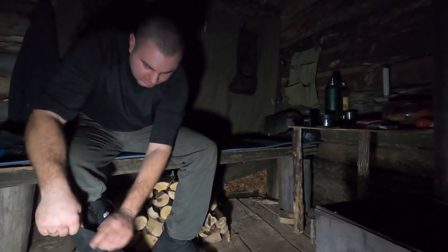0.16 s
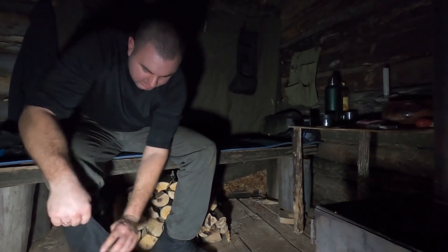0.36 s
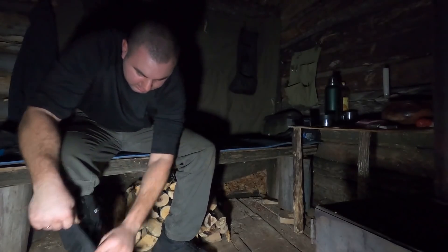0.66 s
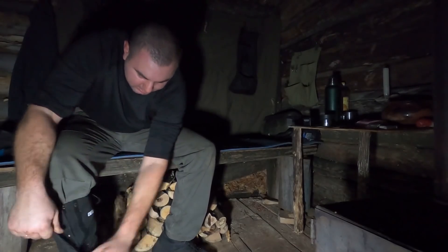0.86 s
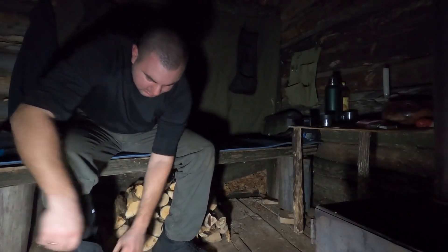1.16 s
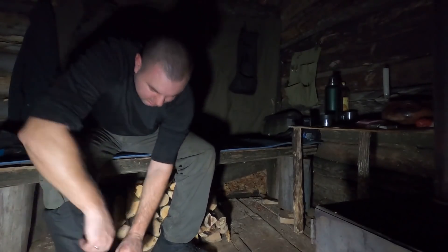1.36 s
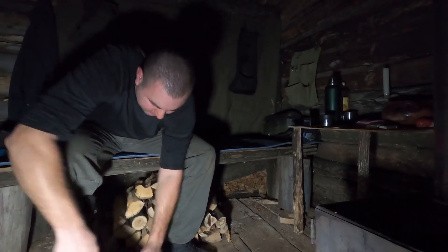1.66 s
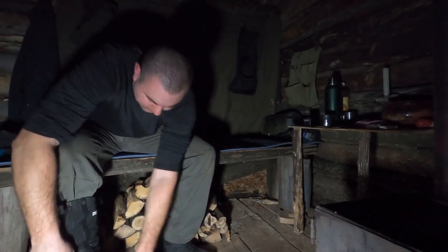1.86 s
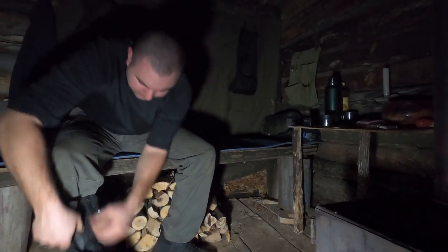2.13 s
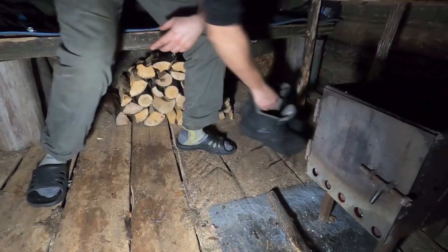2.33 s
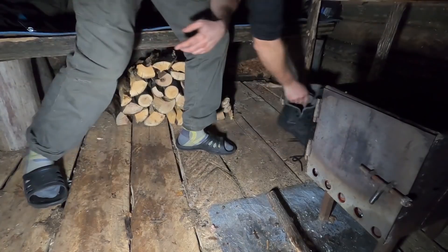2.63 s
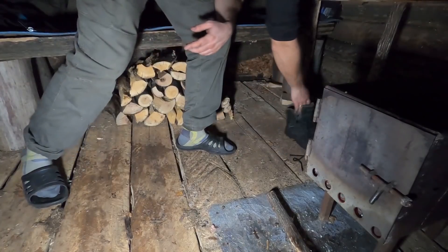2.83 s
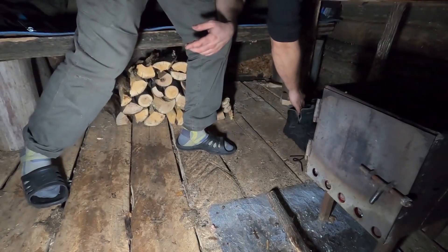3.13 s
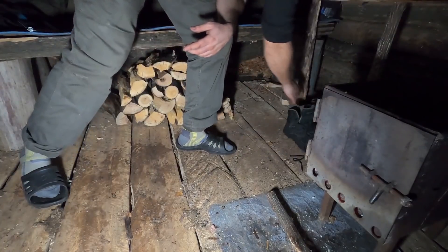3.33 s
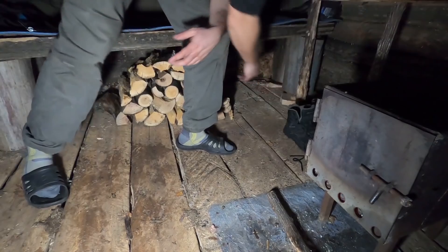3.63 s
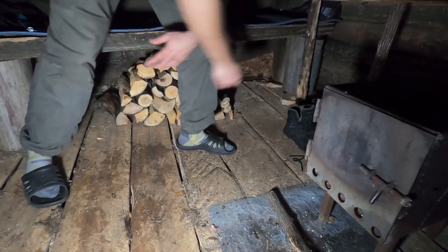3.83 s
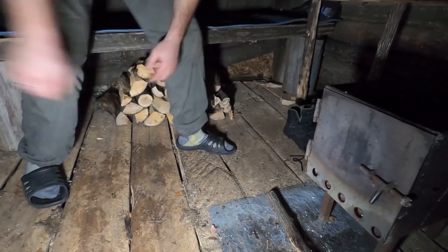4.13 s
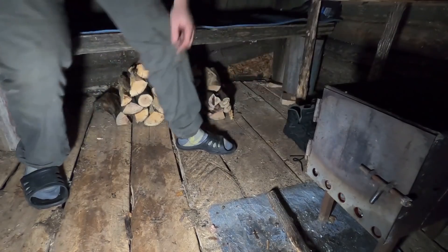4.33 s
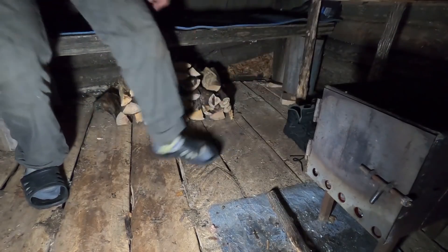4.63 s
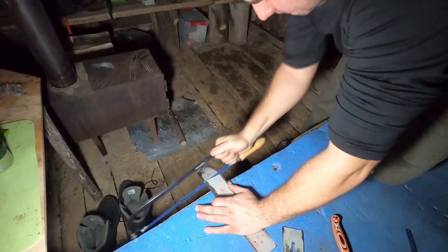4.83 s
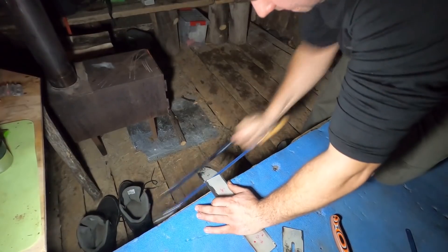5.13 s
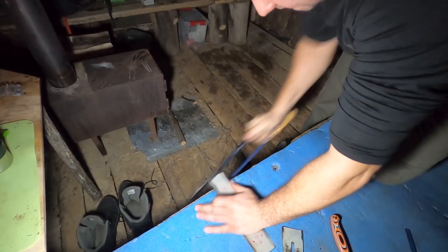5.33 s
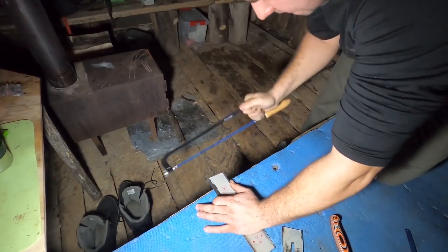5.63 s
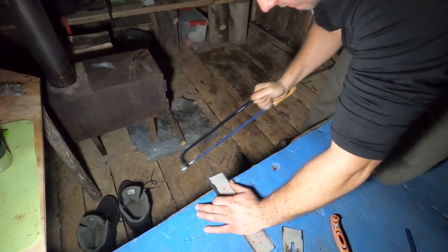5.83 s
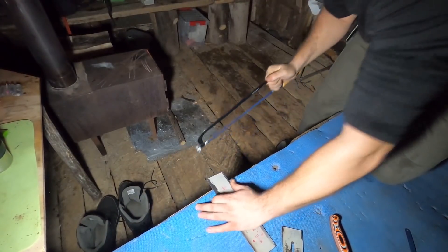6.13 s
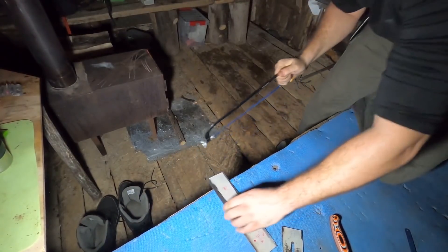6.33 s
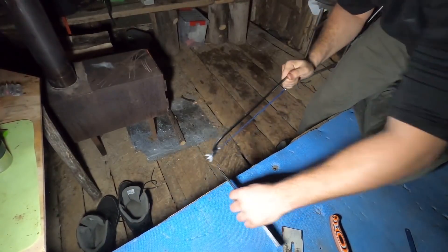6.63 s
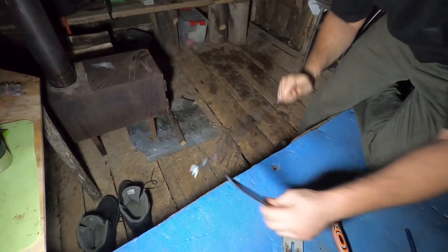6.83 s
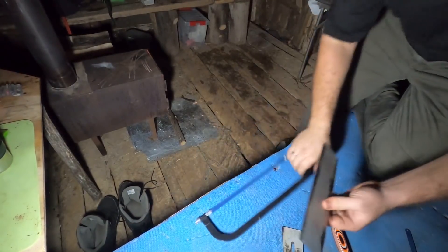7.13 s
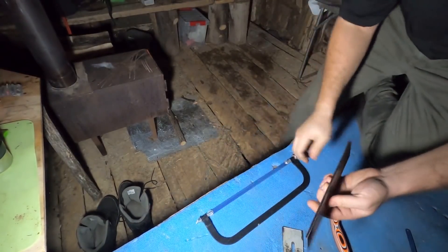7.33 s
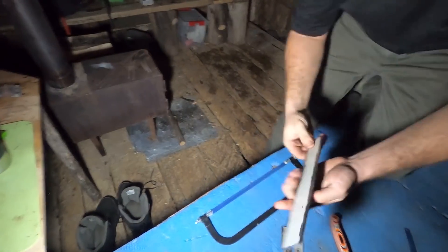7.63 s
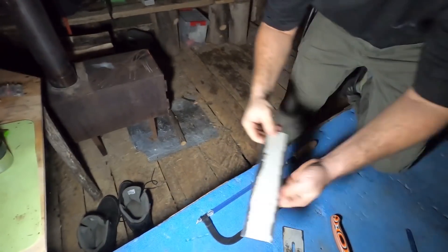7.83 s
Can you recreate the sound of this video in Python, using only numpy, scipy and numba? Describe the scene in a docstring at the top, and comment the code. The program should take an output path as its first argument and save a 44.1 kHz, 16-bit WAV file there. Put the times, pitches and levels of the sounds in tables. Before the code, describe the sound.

Leather and cloth rub and snap as a boot is tugged off and thudded onto planks, then a saw rasps and pieces clatter on a bench.

```python
"""A boot is tugged off in a small log cabin: leather and cloth rub as clicks through resonances, folds snap.
A stove draws with a low hum, coloured noise; boot and step on the planks ring floor modes.
Then the scene cuts to a bench, where a bow saw ends its cut: uneven bites ring slat and blade.
The freed blade pings; slat and saw are knocked, slid and laid on the bench, which rings and booms.
A small stereo microphone stands close by; log walls echo through eight coupled delay lines."""
import sys
import numpy as np
from scipy import signal
from scipy.fft import rfft, irfft
from scipy.io import wavfile
from scipy.ndimage import uniform_filter1d
from numba import njit

SR = 44100
rng = np.random.default_rng(int(sys.argv[2]) if len(sys.argv) > 2 else 0)


def file_out(sig):
    """Save sig as 16-bit WAV at sys.argv[1]."""
    # one column per channel
    cols = np.atleast_2d(sig).T
    # limit, then scale
    lim = np.clip(cols, -1, 1)
    pcm = np.round(lim * 32767).astype(np.int16)
    wavfile.write(sys.argv[1], SR, pcm)


N = 351477
T = np.arange(N) / SR

# stove hum and bench hum, spectra: f/Hz, relative level/dB per Hz
STOVE_SPECTRUM = [(12, -27.5), (20, -9), (32, 2.5), (54, -13), (127, 2), (248, -27.5), (281, -30),
                  (335, -32.5), (375, -50), (393, -32), (419, -24), (454, -36.5), (585, -40), (792, -54),
                  (900, -57.5), (1170, -86), (1980, -120)]
BENCH_HUM_SPECTRUM = [(12, -33.5), (22, -3), (117, -9), (170, -29), (300, -41.5), (600, -42), (1000, -44.5),
                      (1600, -110)]
# low hum: t/s, level/dB
HUM_LEVEL = [(0.0, -33.5), (0.29, -37), (2.42, -38.5), (3.08, -32.5), (3.53, -38), (4.06, -34),
             (4.88, -39.5), (5.64, -39.5), (5.86, -42.5), (7.04, -44.5), (7.26, -38.5), (7.97, -43.5)]
# faint hiss that comes and goes: t/s, level/dB
HISS_LEVEL = [(4.6, -73), (4.7, -84), (5.88, -84), (5.92, -78), (6.07, -82), (6.3, -70), (7.44, -70),
              (7.49, -84), (7.59, -84), (7.62, -70)]
CUT_S = 4.76  # abrupt change of scene, stove to bench

# tugs and brushes of cloth and leather: full at t/s, rise/s, hold/s, fall/s, level/dB before colour,
# then against that level: treble/dB, scuff/dB, low/dB
RUBS = [(0.014, 0.09, 0.052, 0.094, -30, -2, 1, -15.5), (0.129, 0.087, 0.032, 0.064, -32, -8, -0.5, -5),
        (0.301, 0.074, 0.041, 0.045, -45, 1, -0.5, -8.5),
        (0.353, 0.0055, 0.038, 0.092, -31, -26, -5, -10.5),
        (0.49, 0.0077, 0.0035, 0.031, -33.5, -10, -13, -13),
        (0.551, 0.05, 0.0067, 0.088, -45.5, 1, -1, -5.5),
        (0.659, 0.035, 0.024, 0.038, -26.5, -1, -7, -15.5),
        (0.724, 0.066, 0.0099, 0.13, -31, -2, -4.5, -14), (0.802, 0.054, 0.098, 0.042, -29, -9, -3.5, -11),
        (0.835, .05, 0.021, .03, -36, -5, -22, -23), (1.014, 0.093, .005, 0.058, -50.5, 1, -2, -11),
        (1.052, 0.026, 0.0045, 0.066, -47.5, 4.5, 1.5, -4),
        (1.207, 0.18, 0.21, 0.23, -50.5, 2.5, -3.5, -4.5), (1.606, 0.19, 0.023, 0.067, -47, 1, -4.5, -9),
        (1.676, 0.02, 0.043, 0.055, -37, 1, -7.5, -22), (1.742, 0.052, 0.047, 0.055, -27.5, -3, -1, -5.5),
        (1.907, 0.076, 0.0057, 0.12, -54, -3, -2, -4), (2.054, 0.016, 0.0042, 0.042, -41.5, 1, -30, -7.5),
        (2.118, 0.15, 0.16, 0.016, -49.5, 2, -7, -8.5), (2.32, 0.047, 0.053, 0.038, -60, -28, -5, -17),
        (2.568, 0.51, 0.16, 0.44, -59, -14, 1.5, 1), (2.932, 0.048, 0.027, 0.12, -50.5, -11, -7, 12),
        (3.171, 0.19, 0.03, 0.08, -84, -22, 15.5, 20), (3.928, 0.51, 0.051, 0.37, -75, -11, 6.5, -21),
        (4.31, 0.65, 0.065, 0.45, -72.5, 2, -4.5, -4), (4.455, 0.018, 0.0041, 0.18, -58.5, -21, -3.5, 5.5),
        (4.61, 0.08, 0.0056, 0.57, -72, -7, -7, -25.5),
        (5.507, 0.0064, 0.0028, 0.022, -25.5, -26, -18, -6.5),
        (5.579, .03, .003, 0.026, -53.5, 8.5, -0.5, 7.5), (6.323, 0.043, 0.024, 0.34, -52, -21, -18, -9),
        (6.44, 0.33, 0.035, 0.11, -45.5, -3.5, -11.5, -33), (6.74, 0.071, 0.011, 0.15, -66, -1, 7.5, -6),
        (7.179, 0.014, 0.0026, 0.095, -46.5, -25, -9, -16), (7.303, 0.14, 0.041, 0.054, -68, -1, 3, -8),
        (7.366, 0.043, 0.01, 0.2, -52, -2, -11, -12), (7.683, 0.12, 0.02, 0.052, -61.5, -36, 14, 9),
        (7.833, 0.34, 0.15, 0.24, -60, -27, -1.5, -6)]
# cloth and leather resonances: f/Hz, width/Hz, level/dB
RUB_COLOUR = [(347, 560, 2), (1057, 1270, 3), (1750, 1720, -2.5), (2740, 1950, -5), (4120, 4800, -5),
              (9000, 12000, -22)]
# hollow of the boot shaft and folds, one list per rub group: t/s, centre f/Hz, level/dB against the rub
SHAFT = [
    [(0.01, 1373, -20.5), (0.054, 1500, -2.5), (0.1, 900, -11.5), (0.162, 940, -3), (0.2, 1150, -25)],
    [(0.34, 1854, -9), (0.38, 2960, -3), (0.45, 2406, -18.5)],
    [(0.64, 1930, -7.5), (0.68, 1980, -12.5), (0.705, 2680, -1.5), (0.76, 2580, -7.5), (0.785, 1880, -1.5),
     (0.815, 1850, -8), (0.835, 1104, -9), (0.87, 1400, -9.5), (0.888, 2520, -3.5), (0.94, 2020, -17)],
    [(1.66, 2380, -19.5), (1.69, 2094, -10), (1.748, 2110, -5), (1.776, 1850, -11), (1.83, 1270, -16.5)],
    [(2.36, 1680, -29), (2.412, 1410, -4), (2.644, 1680, -5), (2.772, 1380, 2), (2.88, 1500, -6)],
    [(3.75, 1350, 2), (3.95, 1650, 6), (4.2, 1312, -6)],
]
RUB_FADE_DB = 30  # depth below full at the far ends of rise and fall
CRACKLE_PER_S, CRACKLE_DB = 300, -9  # coarse creases giving way; level against the rub
# folds that snap loose, and from 6.2 s small ticks as the slat is handled and slid on the bench: # t/s, peak
# level/dB, centre f/Hz
SNAPS = [(0.021, -15, 1440), (.147, -15, 940), (0.2505, -37.5, 1590), (0.292, -25.5, 2750),
         (0.3513, -24, 1040), (.375, -24, 3270), (.398, -23, 2000), (.421, -31, 2800), (0.4882, -31, 1860),
         (0.5525, -34, 3150), (0.6103, -32, 2570), (0.6425, -21.5, 2180), (0.728, -27, 1980),
         (0.7841, -23, 1950), (1.05, -32.5, 1960), (1.4034, -39, 2130), (1.6616, -26.5, 3050),
         (1.906, -36.5, 846), (2.0532, -40, 1600), (2.293, -41, 1503), (3.215, -52, 1320),
         (3.6306, -49.5, 3520), (4.361, -57, 2305), (4.4541, -44.5, 1260), (4.482, -51, 3100),
         (6.278, -45.5, 4060), (6.464, -37, 3600), (6.5661, -41, 1990)]
SNAP_T60_S = 0.051

# boot and step on the floor: t/s, peak level/dB, slap/dB, rattle t60/s, ring centre f/Hz
THUDS = [(2.897, -28, -52, 0.11, 250), (2.93, -16.5, -50, 0.13, 207), (2.945, -9.5, -15, 0.1, 205),
         (2.966, -10.5, -35, 0.07, 287), (2.988, -22.5, -43, 0.056, 230), (3.137, -33.5, -53, 0.097, 398),
         (3.167, -38, -57, 0.074, 407), (4.47, -36, -56, 0.076, 207)]
# floor plank modes: f/Hz, relative level/dB, t60/s
PLANKS = [(114, -7, 0.17), (138, -2.5, 0.1), (164, 8, 0.061), (189, 3, 0.2), (221, 9, 0.099),
          (245.6, 10, 0.084), (278, 3, 0.06), (314, 6, 0.047), (383, -1, 0.06), (468, 5.5, 0.038)]
# leather on wood: f/Hz, width/Hz, relative level/dB
SLAP = [(865, 540, 18), (1140, 280, 11), (1730, 350, -8), (2170, 130, 8)]

# saw strokes: start t/s, end t/s, relative level/dB, peak place 0-1, nominal teeth per s at full speed,
# then against that level: hollow ring/dB, body ring/dB, upper ring/dB, chatter/dB, whine/dB;
# share by which the ring pitches rise with speed, place of the fullest hollow ring 0-1
STROKES = [(4.763, 4.821, -33.5, 0.35, 697.3, 2, -0.5, -1.5, -14.5, -22, 0.0079, 1),
           (4.822, 5.013, -27, 0.35, 902, 4, 1.5, 3, -4, -4, 0.021, 0.82),
           (5.018, 5.213, -24.5, 0.39, 878, -5, -0.5, -1, -13, -8.5, 0.026, 0.75),
           (5.217, 5.403, -24.5, 0.4, 898, 1.5, 2, -2.5, -8, -3, 0.093, .65),
           (5.415, 5.476, -33, 0.66, 981, -4, -12, 0, -7.5, -29, .02, .4)]
# slat and blade resonances: f/Hz, width/Hz, relative level/dB
SAW_RINGS = [(216, 15, -7.5), (396.6, 18, -9), (417, 27, -2.5), (465, 28, -11.5), (677.5, 45, -3.5),
             (800, 60, -7.5), (911, 130, 0.5), (1060, 140, 0), (1510, 44, -12), (1742, 120, -5),
             (2046, 180, -4.5), (2234, 170, 2.5), (2960, 250, 0), (3280, 90, -15), (3536, 180, -24.5),
             (4440, 360, -2), (5200, 360, -7.5)]
# broad saw hiss: f/Hz, width/Hz, relative level/dB
SAW_HISS = [(1826, 620, -5.5), (3140, 2480, -1.5), (6450, 5600, -7.5), (11800, 2200, -19.5)]
# slat drawn across the bench: t/s, relative level/dB
SLIDE = [(6.27, -84), (6.31, -61), (6.475, -45.5), (6.495, -60), (6.58, -65)]
CHATTER_PER_S = 103  # nominal
WHINE_HZ, WHINE_SAG = 1541, 0.18  # nominal tooth note at full speed; power of speed by which it falls

# blows on the bench: t/s, knock peak/dB, hollow/dB, tick/dB, boom/dB before its rise, boom f/Hz,
# knock f/Hz, rattle t60/s
KNOCKS = [(4.77, -26, -48, -49, -22, 68, 1830, 0.23), (4.839, -11.5, -48.5, -34, -36, 72, 2000, 0.1),
          (5.451, -27.5, -46.5, -36, -24, 84.1, 1930, 0.23), (5.503, -7, -24.5, -28, -9, 76.3, 1516, 0.022),
          (5.525, -39, -29.5, -39, -28, 75, 1780, 0.22), (5.571, -43, -35.5, -55, -22.5, 73.4, 1670, 0.16),
          (5.734, -39, -7.5, -35, -13.5, 79.4, 825, 0.19), (5.742, -18, -38, -37, -17.5, 81.6, 845, 0.059),
          (5.79, -53, -23, -56, -24, 74, 815, 0.068), (5.896, -45, -18.5, -49.5, -31, 79, 875, 0.1),
          (6.078, -61, -24, -54, -58, 78.5, 904, 0.59), (6.104, -15.5, -10.5, -27, -51, 78.1, 1150, 0.085),
          (6.125, -27, -19, -58, -44, 77, 1240, 0.1), (6.148, -49, -23, -60, -55, 77, 1200, 0.067),
          (6.183, -21, -48, -48, -56, 78.4, 740, 0.16), (6.192, -26, -16.5, -77, -51, 70.0, 1140, 0.13),
          (6.215, -48, -32, -65, -53, 72, 1000, 0.14), (6.245, -54, -22.5, -66, -50, 72, 840, 0.12),
          (6.267, -56, -33.5, -65, -55, 72, 800, 0.066), (7.089, -58, -43.5, -59.5, -41, 69, 710, 0.25),
          (7.18, -30, -25, -53, -23.5, 76, 1160, 0.019), (7.249, -47, -30, -64, -49, 67.4, 1137, 0.084),
          (7.337, -26, -25, -45, -29.5, 82.6, 1060, 0.069), (7.358, -8.5, -9, -57, -8, 69.6, 1090, 0.03),
          (7.437, -39.5, -34.5, -50, -19.5, 74.3, 1130, 0.16), (7.498, -71, -47, -64, -37, 75, 900, 0.082),
          (7.613, -37, -40.5, -53, -34, 85.5, 1180, 0.22), (7.67, -45, -34.5, -66, -21.5, 77.3, 940, 0.32)]
# bench top modes: f/Hz, relative level/dB, t60/s
BENCH = [(215, -4, .06), (265, -2, .05), (334, -1, .04), (404, -2, .035), (520, 0, .03), (620, 0, .03),
         (730, -4, .04), (800, 0, .015), (910, 0, .015), (1080, 0, .015), (1303, 0, .012), (1480, 0, .012),
         (1782, 0, .01), (2309, -2, .008)]
BOOM_T60_S, BOOM_LAG_S, BOOM_RISE_S = .28, .004, .005
# pings of the freed blade: t/s, peak level/dB
PINGS = [(5.4398, -17), (5.5688, -31)]
# blade modes: f/Hz, relative level/dB, t60/s
BLADE = [(3400, -4, .025), (3900, 0, .04), (4380, -5, .03), (5200, -6, .04)]
# modes of the saw frame once laid down: f/Hz, relative level/dB, t60/s
FRAME = [(692, -1, 0.41), (890, -6, 0.3)]
FRAME_S, FRAME_DB = 7.437, -46  # time, peak level

CABIN_T60_S, CABIN_DAMP, CABIN_DB = 0.11, 0.29, -10  # nominal decay, damping 0-1, echo gain
# unrelated part between the ports: f/Hz, level/dB against the middle
SIDE_SPECTRUM = [(100, -22), (500, -14), (1000, -11), (2000, -8), (4000, -4), (8000, -1), (14000, 1)]
# left minus right port: f/Hz, level/dB
LEFT_SPECTRUM = [(100, 2), (600, 1), (2500, 2.3), (5000, 0), (10000, -1.5)]
# lag of the left port: greatest phase/rad, f/Hz where it levels off
LEFT_LAG_RAD, LEFT_LAG_HZ = .7, 2200
MIC_HZ, TOP_HZ = 10750, 15600


def undb(db):
    """Gain of a level in dB."""
    return 10 ** (np.asarray(db) / 20)


def unit(x):
    """Scale to rms 1."""
    return x / np.sqrt(np.mean(x ** 2))


def peak(x):
    """Scale to peak 1."""
    return x / np.abs(x).max()


def decay(t, t60_s):
    """Exponential fall of 60 dB in t60_s."""
    return np.exp(-np.log(1000) * t / t60_s)


def band(x, hz, width_hz):
    """Two-pole resonance with gain 1 at the centre."""
    return signal.lfilter(*signal.iirpeak(min(hz, .45 * SR), hz / width_hz, SR), x)


def sweep(x, hz, width_hz):
    """Resonance whose centre moves from sample to sample."""
    turn = np.exp(2j * np.pi * np.cumsum(hz) / SR)
    keep = np.exp(-np.pi * width_hz / SR)
    poles = np.convolve([1, -keep], [1, -keep ** 2])
    return (signal.lfilter([1], poles, x / turn) * turn).real


def colour(x, table, power=1):
    """Shape by (Hz, dB) points joined on a log-frequency axis."""
    hz, db = np.transpose(table)
    f = np.arange(N // 2 + 1) * SR / N + 1
    return irfft(rfft(x) * undb(power * np.interp(np.log(f), np.log(hz), db)), N)


def walk(rate_hz):
    """Random levels held 1 / rate_hz and slewed twice; rms 1."""
    k = int(SR / rate_hz)
    steps = np.repeat(rng.standard_normal(N // k + 1), k)
    return unit(uniform_filter1d(uniform_filter1d(steps, k), k)[:N])


def grit(per_s, spread_db):
    """Random clicks of spread size over a bed of fine noise."""
    hit = rng.random(N) < per_s / SR
    clicks = unit(hit * undb(spread_db * np.minimum(rng.exponential(size=N), 3)))
    return unit((clicks + 1.2) * rng.standard_normal(N))


def add(out, s, x):
    """Mix x into out from time s."""
    i = int(s * SR)
    out[i:i + len(x)] += x[:N - i]


def rattle(t60_s):
    """A crack that builds within a millisecond, then a dying patter of small contacts."""
    t = T[:SR // 3]
    size = decay(t, t60_s) + 2.06 * np.exp(-t / 0.0013)
    return rng.standard_normal(len(t)) * size * (1 - np.exp(-t / 0.00052))


def blow(modes, push):
    """The push rings the modes, each by a chance amount and slightly off pitch; peak 1."""
    t, ring = T[:len(push)], 0
    for hz, db, t60_s in modes:
        hz = hz * (1 + .025 * rng.standard_normal())
        gain = undb(db + 2.0 * rng.standard_normal())
        ring = ring + gain * np.sin(2 * np.pi * hz * t) * decay(t, t60_s)
    return peak(signal.fftconvolve(push, ring)[:len(t)])


def hum():
    """The low roar of the stove draught as coloured noise; fainter at the bench, with another spectrum."""
    near = np.interp(T, [CUT_S - .01, CUT_S + .01], [1, 0])
    stove = unit(colour(rng.standard_normal(N), STOVE_SPECTRUM))
    bench = unit(colour(rng.standard_normal(N), BENCH_HUM_SPECTRUM))
    return (near * stove + (1 - near) * bench) * undb(np.interp(T, *np.transpose(HUM_LEVEL)))


def hiss():
    """Faint broad noise that comes and goes."""
    noise = unit(band(band(rng.standard_normal(N), 1500, 2500), 1600, 4500))
    return noise * undb(np.interp(T, *np.transpose(HISS_LEVEL)))


def rubbing():
    """Fibres stick and slip in dense clicks; rubs swell, hold and fade; each resonance flickers by itself."""
    mids, treble, scuff, low = np.zeros((4, N))
    for s, rise, hold, fall, db, treble_db, scuff_db, low_db in RUBS:
        near = slice(max(int((s - 2 * rise) * SR), 0), int((s + hold + 2 * fall) * SR))
        t = T[near]
        away = np.maximum(s - t, 0) / rise + np.maximum(t - s - hold, 0) / fall
        size = undb(db - RUB_FADE_DB * away)
        for region, tilt_db in zip((mids, treble, scuff, low), (0, treble_db, scuff_db, low_db)):
            region[near] += size * undb(tilt_db)

    slips = grit(2500, 1.1) * undb(2.5 * np.tanh(walk(90)))
    out = 0
    for (hz, width, db), size in zip(RUB_COLOUR, (low, scuff, mids, mids, treble, treble)):
        tone = unit(band(band(slips, hz, width), hz, 1.72 * width))
        out = out + tone * undb(db + 1.8 * walk(30)) * size

    s, hz, db = np.concatenate(SHAFT).T
    shaft = unit(sweep(slips, np.interp(T, s, hz), 420))
    shaft = shaft * undb(np.interp(T, s, db, right=-60) + 1.3 * walk(52))

    creases = (rng.random(N) < CRACKLE_PER_S / SR) * rng.standard_normal(N)
    crackle = band(creases, 1300, 700) - band(creases, 2700, 1300) + 0.39 * band(creases, 4500, 1800)
    crackle = unit(crackle) * undb(CRACKLE_DB)
    loud = mids > undb(-42)  # only the louder rubs crackle
    return out + (shaft + crackle * loud) * mids


def snaps():
    """A fold lets go, or the slat ticks as it is handled: a sudden gritty burst that dies fast."""
    out, t = np.zeros(N), T[:SR // 5]
    for s, db, hz in SNAPS:
        noise = band(band(rng.standard_normal(len(t)), hz, 0.5 * hz), hz, 1.5 * hz)
        add(out, s, undb(db) * peak(noise * decay(t, SNAP_T60_S)))
    return out


def thuds():
    """A soft sole drops on the planks: a dull, dense ring and a short broad slap."""
    out = np.zeros(N)
    for s, db, slap_db, rattle_s, ring_hz in THUDS:
        push = rattle(rattle_s)
        ring = band(band(blow(PLANKS, push), ring_hz, 1.5 * ring_hz), ring_hz, 2.05 * ring_hz)
        slap = sum(undb(tilt_db) * unit(band(band(push, hz, width), hz, 2 * width))
                   for hz, width, tilt_db in SLAP)
        add(out, s, undb(db) * peak(ring) + undb(slap_db) * peak(slap))
    return out


def saw():
    """Uneven bites and chatter ring slat, blade and bench, higher with stroke speed; later the slat slides."""
    near = slice(int(4.7 * SR), int(6.7 * SR))
    t = T[near]
    force, teeth, hollow, body, upper, jolt, bend, sing, pace = np.zeros((9, len(t)))
    for (start, end, db, place, per_s, hollow_db, body_db, upper_db,
         chatter_db, whine_db, share, late) in STROKES:
        span = end - start
        speed = np.sin(np.pi / 2 * np.interp(t, [start, start + place * span, end], [0, 1, 0]))
        push = undb(db) * speed ** 0.74
        swell = np.interp(t, [start - .02, start + late * span, end + 0.02], [0, 1, 0])
        force += push
        hollow += undb(db + hollow_db) * swell ** 0.76
        body += push * undb(body_db)
        upper += push * undb(upper_db)
        jolt += (speed > 0) * undb(chatter_db)
        sing += push * speed ** 1.9 * undb(whine_db)
        pace += speed
        teeth += per_s * speed
        bend += share * (speed - 1) * (speed > 0)  # ring pitch follows stroke speed

    def count(per_s):
        """Events per sample at a varying rate."""
        return np.diff(np.floor(np.cumsum(per_s) / SR), prepend=0)

    bites = count(teeth * undb(4.4 * walk(400)[near]))
    # each bite tears fibres for a moment
    tear = .35 + signal.lfilter([1], [1, -.93], bites * rng.random(len(t)))
    jolts = count(CHATTER_PER_S * undb(1.1 * walk(100)[near]))
    chatter = unit(jolts * undb(4.7 * rng.standard_normal(len(t))))
    slide = undb(np.interp(t, *np.transpose(SLIDE), left=-120, right=-120) + 1.6 * walk(40)[near])
    drift = .025 * walk(15)[near]  # the ring pitches wander slightly at random

    def rasp(hz, width, wander_db):
        """Tearing and chatter through one resonance, whose strength wanders."""
        drive = unit(tear * rng.standard_normal(len(t))) + jolt * chatter
        return undb(wander_db * walk(22)[near]) * unit(sweep(drive, hz * (1 + bend + drift), width))

    def ring_size(hz):
        """Envelope of a ring by its region; the slide drives 850 Hz and up."""
        if hz < 500:
            return hollow
        if hz < 850:
            return body
        if hz < 1300:
            return body + slide
        if hz < 2500:
            return upper + slide
        return force + slide

    ring = sum(undb(db) * rasp(hz, width, 1.88) * ring_size(hz) for hz, width, db in SAW_RINGS)
    saw_hiss = sum(undb(db) * rasp(hz, width, 0.25) for hz, width, db in SAW_HISS)
    shake = rasp(63, 34, 0.76) * uniform_filter1d(force, SR // 12)  # the bench shakes
    note_hz = WHINE_HZ * pace ** WHINE_SAG
    whine = rasp(note_hz, 45, 1.6) + .6 * rasp(2 * note_hz, 110, 1.2)
    out = np.zeros(N)
    out[near] = sing * whine + undb(-11.0) * ring + undb(-2.0) * force * saw_hiss + undb(-9.5) * shake
    return out


def knocks():
    """Blows ring the bench top; the legs follow with a low boom; frame and freed blade ring their modes."""
    out, t = np.zeros(N), T[:SR // 2]
    for s, knock_db, hollow_db, tick_db, boom_db, boom_hz, knock_hz, rattle_s in KNOCKS:
        push = rattle(rattle_s)
        top = blow(BENCH[7:], push)  # upper modes
        knock = band(top, knock_hz, 0.23 * knock_hz) + 0.052 * top
        hollow = band(band(blow(BENCH[:9], push), 330, 600), 360, 1200)
        tick = band(band(push, 5100, 4800), 7300, 8000)
        add(out, s, undb(knock_db) * peak(knock) + undb(hollow_db) * hollow + undb(tick_db) * peak(tick))
        boom = np.sin(2 * np.pi * boom_hz * t) * decay(t, BOOM_T60_S)
        add(out, s + BOOM_LAG_S, undb(boom_db) * boom * (1 - np.exp(-t / BOOM_RISE_S)))
    add(out, FRAME_S, undb(FRAME_DB) * blow(FRAME, rattle(0.047)))
    for s, db in PINGS:
        add(out, s, undb(db) * blow(BLADE, rattle(0.045)))
    return out


@njit
def walls(x, lags, gain, damp):
    """Eight delay lines that feed each other, duller on every round."""
    line, soft, out = np.zeros((8, 4096)), np.zeros(8), np.zeros((2, len(x)))
    for i in range(len(x)):
        total = 0.
        for k in range(8):
            soft[k] += (1 - damp) * (gain[k] * line[k, (i - lags[k]) & 4095] - soft[k])
            total += soft[k]
            out[k % 2, i] += soft[k]
        for k in range(8):
            line[k, i & 4095] = x[i] + soft[k] - total / 4
    return out


def ports(mid):
    """Close reflections reach the two ports by different paths; the left port lags and differs in level."""
    t = T[:SR // 10]
    scatter = rng.standard_normal(len(t)) * np.exp(-t / .012)
    side = colour(signal.fftconvolve(mid, scatter / np.linalg.norm(scatter))[:N], SIDE_SPECTRUM)
    side = side * walk(60)  # the difference between the ports fluctuates at random
    f = np.arange(N // 2 + 1) * SR / N
    lag_rad = LEFT_LAG_RAD * np.tanh(f / LEFT_LAG_HZ)
    left = irfft(rfft(mid) * np.exp(-1j * lag_rad), N)
    return np.array([colour(left + side, LEFT_SPECTRUM, power=.5),
                     colour(mid - side, LEFT_SPECTRUM, power=-.5)])


def scene():
    """All sources, the echo of all but hum and hiss from the log walls, and the two ports."""
    sources = rubbing() + snaps() + thuds() + saw() + knocks()
    lags = rng.integers(200, 1200, 8)  # samples
    gain = undb(-60 * lags / SR / CABIN_T60_S)
    echo = walls(sources + 1e-18, lags, gain, CABIN_DAMP)  # offset keeps the loop off denormals
    return ports(sources + hum() + hiss() + undb(CABIN_DB) * echo[0])


def record(dry):
    """The microphone dulls the highest treble and the recorder cuts the top steeply."""
    dull = signal.lfilter(*signal.butter(2, MIC_HZ, fs=SR), dry)
    return signal.sosfilt(signal.ellip(10, .2, 80, TOP_HZ, fs=SR, output="sos"), dull)


dry = scene()
out = record(dry)
file_out(out)
```